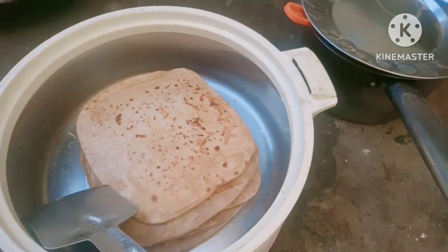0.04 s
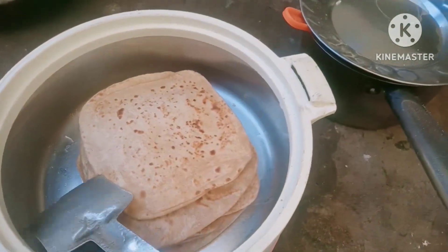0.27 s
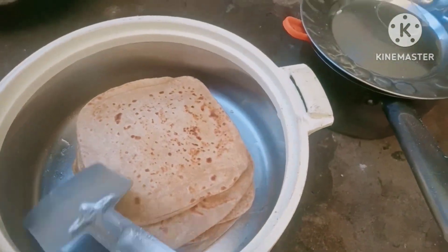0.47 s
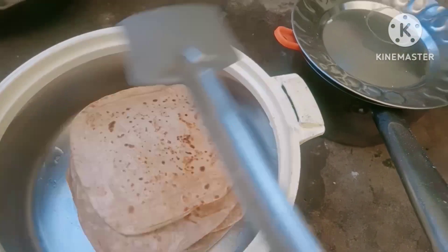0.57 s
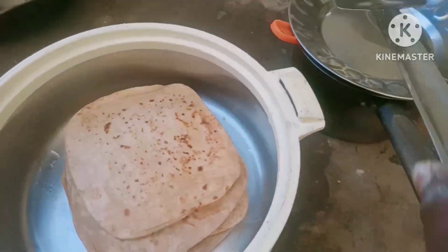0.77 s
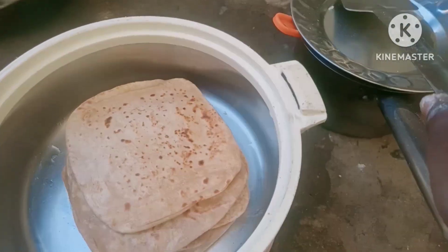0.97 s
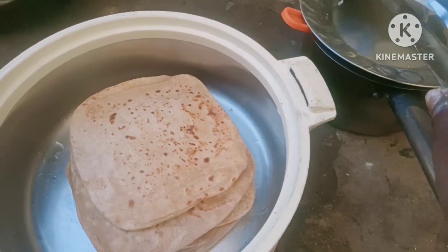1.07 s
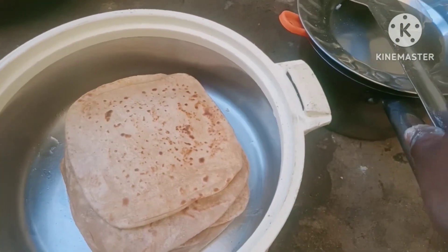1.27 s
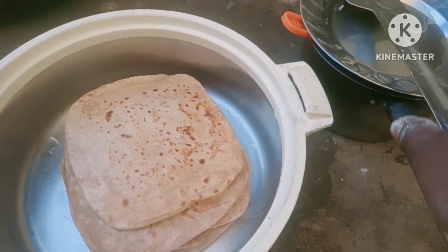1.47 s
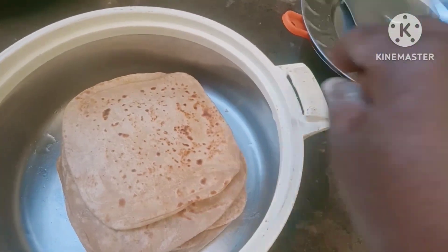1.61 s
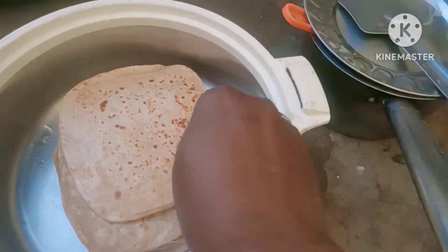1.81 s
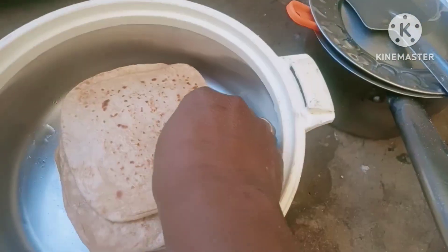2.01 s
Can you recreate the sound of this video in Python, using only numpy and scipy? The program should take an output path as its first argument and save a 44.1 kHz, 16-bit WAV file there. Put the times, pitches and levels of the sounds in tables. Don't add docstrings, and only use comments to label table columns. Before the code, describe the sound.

Steel plates clatter loudly as a spatula is put down on them, after a short scrape, thin squeak and soft thumps of flatbread in a pot; small kitchen, close phone microphone, loudest hits distorting.

```python
import sys
import numpy as np
from scipy import signal
from scipy.fft import rfft, irfft, next_fast_len
from scipy.io import wavfile
from scipy.ndimage import map_coordinates

SR = 44100
rng = np.random.default_rng(int(sys.argv[2]) if len(sys.argv) > 2 else 0)


def magnitude_from_level(level_db):
    exponent = np.asarray(level_db, float) / 20
    return 10 ** exponent


def log_audio(samples):
    frames = np.atleast_2d(samples).T
    limited = np.clip(frames, -1, 1)
    pcm = np.round(limited * 32767).astype(np.int16)
    wavfile.write(sys.argv[1], SR, pcm)


N = 90404


def along(points, hz):
    point_hz, value = np.transpose(points)
    return np.interp(np.log(hz + 1), np.log(point_hz + 1), value)


def unit(x):
    return x / np.sqrt(np.mean(x ** 2) + 1e-20)


def coloured(x, spectrum):
    size = next_fast_len(len(x) + 4096)
    gain = magnitude_from_level(along(spectrum, np.fft.rfftfreq(size, 1 / SR)))
    return unit(irfft(rfft(x, size) * gain, size)[:len(x)])


def above(x, low_hz):
    return signal.sosfilt(signal.butter(4, low_hz, "high", fs=SR, output="sos"), x)


def wobble(knots_per_s):
    knots = rng.standard_normal(int(N * knots_per_s / SR) + 4)
    return map_coordinates(knots, [np.arange(N) * knots_per_s / SR])


def ring(hz, db, t60_s, t):
    decay = np.exp(-np.log(1000) * t / t60_s[:, None])
    return magnitude_from_level(db) @ (decay * np.sin(2 * np.pi * hz[:, None] * t))


def dying(t60_points, length, long=1):
    hz, t, z = signal.stft(rng.standard_normal(length), SR, nperseg=256)
    t60_s = long * along(t60_points, hz)[:, None]
    tail = signal.istft(z * magnitude_from_level(-60 * t / t60_s), SR, nperseg=256)[1][:length]
    return tail / np.linalg.norm(tail)


def add(track, s, sound):
    part = track[round(s * SR):][:len(sound)]
    part += sound[:len(part)]


# (frequency [Hz], density [dB per Hz])
AIR_SPECTRUM = [(18, -58), (30, -13), (200, -4.5), (400, -16.5), (883, -24.5), (1060, -24), (1700, -20.5),
                (6830, -23), (15800, -46)]
AIR_DB = -43


def air():
    noise = coloured(rng.standard_normal(N), AIR_SPECTRUM)
    return magnitude_from_level(AIR_DB + wobble(8)) * above(noise, 45)


# (frequency [Hz], T60 [s])
ROOM_DECAY = [(200, 0.37), (3000, 0.24), (12000, 0.16)]


def room(x):
    return signal.fftconvolve(np.pad(x, (300, 0)), dying(ROOM_DECAY, SR // 2))[:N]


# (time [s], level [dB])
SCRAPE_PRESSURE = [(0, -36), (0.049, -33.5), (0.148, -31.5), (.23, -42.5), (.4, -49.5), (.6, -48.5),
                   (0.688, -80), (0.705, -44.5), (.8, -47)]
# (frequency [Hz], density [dB per Hz])
RASP_SPECTRUM = [(180, -30), (300, -2), (411, -20), (563, -7), (839, -6), (3990, -2), (8550, -18.5),
                 (12500, -16), (15800, -25)]
GRIT_PER_S, GRIT_DB, GRIT_SPREAD_DB = 2500, -4, 1.5


def scrape():
    s, db = np.transpose(SCRAPE_PRESSURE)
    hits = rng.random(N) < GRIT_PER_S / SR
    grit = hits * rng.standard_normal(N) * magnitude_from_level(GRIT_SPREAD_DB * rng.exponential(1, N))
    friction = rng.standard_normal(N) + magnitude_from_level(GRIT_DB) * unit(grit)
    pressure_db = np.interp(np.arange(N) / SR, s, db, right=-120) + 2.3 * wobble(34.4)
    return coloured(friction, RASP_SPECTRUM) * magnitude_from_level(pressure_db)


# (frequency [Hz], level [dB], peak time [s], spread [s])
SQUEAK_TONES = [(4050, -33, .162, .013), (4040, -35, .212, .014), (11250, -48, .12, .02),
                (11300, -49, .18, .025), (12250, -42, .18, .028), (13300, -48, .228, .008),
                (13900, -49, .177, .01), (7200, -47, .167, .008)]
SQUEAK_FLUTTER_DB, SQUEAK_BLUR_RAD = 5, 0.045


def squeak():
    out, t = np.zeros(N), np.arange(N) / SR
    for hz, db, peak_s, spread_s in SQUEAK_TONES:
        swell = np.exp(-((t - peak_s) / spread_s) ** 2 / 2)
        level = magnitude_from_level(db + SQUEAK_FLUTTER_DB * wobble(97.4) / 2)
        drift = np.cumsum(SQUEAK_BLUR_RAD * hz / 8000 * rng.standard_normal(N))
        out += swell * level * np.sin(2 * np.pi * hz * t + drift)
    return out


# (time [s], peak [dB], upper shell modes [dB], slap [dB], deepest mode [dB])
POT_THUMPS = [(0.111, -24, 17.5, 2, -3.5), (.238, 3.5, -6, 1, 3), (0.297, -4, -8, -6.5, -12),
              (0.364, -3, -4, 1.5, -20), (0.454, -11.5, 6.5, -0.5, -9), (0.525, -24, -25, -16, -2),
              (.699, -27.5, 13.5, 13.5, -16), (.773, -8, 14, -1, -27), (0.797, -22, 19.5, 7, -7),
              (1.233, -26.5, -10, -18, -12)]
# (frequency [Hz], level [dB], T60 [s])
POT_MODES = [(161.4, 0, 0.21), (204.9, -1.5, 0.14), (243.7, -9, 0.28), (379, -30, 0.19),
             (482, -14.5, 0.053), (564, -16, 0.079), (767, -30.5, 0.17), (304, -25, 0.43)]
# (frequency [Hz], density [dB per Hz])
SLAP_SPECTRUM = [(410, 3.5), (700, -1), (965, -3.5), (1180, -2), (3180, -3), (9330, -28), (15000, -31)]
SHELL_FROM_HZ, THUMP_RISE_S, POT_LOW_HZ = 330, 0.0016, 119
SLAP_T60_S, SLAP_DB = 0.3, -24.5


def pot():
    out, t = np.zeros(N), np.arange(SR // 3) / SR
    hz, db, t60_s = np.transpose(POT_MODES)
    for s, peak_db, shell_db, slap_db, deep_db in POT_THUMPS:
        level_db = db + shell_db * (hz > SHELL_FROM_HZ) + deep_db * (hz == hz.min())
        boom = ring(hz, level_db, t60_s, t) / 2
        slap_decay = magnitude_from_level(SLAP_DB + slap_db - 60 * t / SLAP_T60_S)
        slap = slap_decay * coloured(rng.standard_normal(len(t)), SLAP_SPECTRUM)
        rise = 1 - np.exp(-t / THUMP_RISE_S)
        add(out, s, magnitude_from_level(peak_db) * rise * (boom + slap))
    return above(out, POT_LOW_HZ)


# (peak time [s], frequency [Hz], level [dB], length [s])
PLATE_KNOCKS = [(1.05, 545.5, -13.5, 0.031), (1.052, 347.4, -17.5, 0.033), (1.088, 442, -15.5, 0.023),
                (1.108, 516.5, -10, 0.026), (1.441, 531, -13, .016), (1.454, 449, -13, .018),
                (1.551, 456, -8.5, .016), (1.578, 522, -15, .016), (1.582, 322, -17, .025),
                (1.612, 451, -4.5, 0.01513), (1.625, 440, -6.5, 0.01847), (1.655, 377, -18.5, .06),
                (1.655, 563, -24.5, .05), (1.68, 467, -13.5, .014), (1.699, 448, -10, .04),
                (1.703, 356.3, -15, 0.037), (1.74, 369, -36, 0.063), (1.76, 550, -25.5, .06),
                (1.806, 491, -24.5, .03), (1.855, 540, -29, 0.051), (1.88, 413, -29.5, .03)]


def knocks():
    out = np.zeros(N)
    for peak_s, hz, db, length_s in PLATE_KNOCKS:
        t = np.arange(round(length_s * SR)) / SR
        swell = np.sin(np.pi * t / length_s) ** 2
        add(out, peak_s - length_s / 2, magnitude_from_level(db) * swell * np.sin(2 * np.pi * hz * t))
    return out


# (time [s], level [dB])
RIM_TICKS = [(0.962, -21.5), (1.546, -16.5), (1.676, -14), (1.741, -12.5), (1.787, -18.5), (1.835, -22),
             (1.857, -22.5)]
TICK_HZ, TICK_T60_S = 1576, 0.018


def ticks():
    out, t = np.zeros(N), np.arange(SR // 20) / SR
    for s, db in RIM_TICKS:
        add(out, s, magnitude_from_level(db - 60 * t / TICK_T60_S) * np.sin(2 * np.pi * TICK_HZ * t))
    return out


# (time [s], frequency [Hz], level [dB], length until damped [s])
LONE_PINGS = [(1.409, 2240, -13, .027), (1.481, 3228, -13, .026), (.860, 1890, -22, .17),
              (1.464, 1935, -12, .11), (.906, 3075, -26, .013), (.861, 3495, -23, .028),
              (1.128, 2361, -23, .175), (1.112, 3020, -22, .11), (1.463, 560, -19, .078),
              (.906, 3522, -20, .036), (.849, 1435, -23, .034), (.847, 556, -23, .034),
              (.979, 3043, -25, .024), (.979, 2376, -28, .04), (.881, 3050, -28, .013),
              (1.049, 2372, -24, .034), (1.096, 1072, -26, .038), (1.104, 1935, -24, .085),
              (1.118, 538, -23, .042), (1.112, 2792, -30, .065), (1.446, 1340, -20, .064),
              (1.462, 2620, -24, .09), (1.601, 1940, -14, .068), (1.579, 1352, -16, .044),
              (1.579, 3018, -14, .048), (1.706, 2368, -22, .05), (1.716, 1881, -21, .115),
              (1.716, 3205, -24, .062), (1.803, 3478, -30, .075), (1.626, 1437, -21, .028),
              (1.696, 1350, -23, .044), (1.806, 1037, -39, .03), (1.088, 12400, -30, .02),
              (.847, 13100, -40, .04), (1.842, 2614, -36, .08), (1.795, 11100, -46, .035),
              (1.580, 12300, -32, .02), (1.700, 11100, -36, .03), (1.083, 1552, -17, .012)]
PING_T60_S, PING_RISE_S, DAMP_S = 0.45, 0.00075, 0.004


def pings():
    out = np.zeros(N)
    for s, hz, db, length_s in LONE_PINGS:
        t = np.arange(round((length_s + 8 * DAMP_S) * SR)) / SR
        shape = (1 - np.exp(-t / PING_RISE_S)) * np.exp(-np.maximum(t - length_s, 0) / DAMP_S)
        add(out, s, magnitude_from_level(db - 60 * t / PING_T60_S) * shape * np.sin(2 * np.pi * hz * t))
    return out


# (time [s], peak [dB], low modes [dB], mid modes [dB], ring time factor [1])
TOUCHING_CONTACTS = [(0.844, -9.5, 3, 0.5, 0.39), (0.8574, -15.5, -21, -4, 0.64),
                     (0.8846, -13.5, -25, -10, 0.5), (0.9073, -17, -4, -29, 0.8),
                     (0.9594, -16.5, 1.5, -2.5, 0.41), (0.9794, -22, -2, -1, 1)]
LAYING_CONTACTS = [(1.0454, -14, -7, 0.5, 0.69), (1.052, -11.5, 2, -1.5, 0.7),
                   (1.0864, 2.5, -12, -12, 0.51), (1.0974, -12.5, 2, 1, 0.17),
                   (1.1394, -29.5, -20, 8.5, 0.43), (1.2625, -28.5, -28, -24, 0.46)]
SETTLING_CONTACTS = [(1.351, -24.5, -44, -10, 0.77), (1.3709, -13, -11, -20, 0.2),
                     (1.4082, -14.5, -4, -3.5, 1), (1.4348, 4, -6.5, -8, 1), (1.4452, 1.5, -7.5, -8, 0.84),
                     (1.4537, -3, -23, -29, 0.85), (1.4804, -15, -25, -20, 1),
                     (1.543, -9.5, -17, 1.5, 0.55), (1.5774, 2.5, -9, -7.5, 0.52),
                     (1.6064, -3, -2, -2, 0.81), (1.6211, -3, -11, -11, 0.41), (1.6454, -17, -8, 6, 0.77),
                     (1.6757, -13.5, 5, 4, 0.41), (1.694, -4, 1.5, -4.5, 0.51),
                     (1.7143, -11, -22, -20, 0.72), (1.7403, -13.5, -14, 3, 0.28),
                     (1.7872, -22.5, 4, 4.5, 0.85), (1.8066, -18.5, -1.5, 2, 0.35),
                     (1.8347, -40, -5, -12, 0.43), (1.8574, -27.5, -4, -4, 1),
                     (2.0144, -26.5, -43, -22, 0.28)]
# (frequency [Hz], level [dB], T60 [s])
BLADE_MODES = [(357, -10.5, 0.24), (441, -5.5, 0.18), (548, -8, 0.5), (1067, -17.5, 0.25), (1360, -15, 1),
               (1448, -5, 0.16), (1815, -9.5, 0.6), (1860, -25, 1), (2323, 0, 0.092), (2620, -30, 0.18),
               (2980, -6, 0.04), (3530, -4, 0.11), (3100, -7, 0.23), (3810, -16, 0.14)]
PLATE_MODES = [(359, -13, 0.29), (438.5, -5.5, 0.21), (547, -7.5, 0.29), (1345, -11, 0.42),
               (1451, -10.5, 0.25), (1900, -9, 0.66), (1950, -9.5, 0.84), (2184, -12, 0.24),
               (2665, -35, 0.53), (2500, -40, 0.13), (2876, -14.5, 0.55), (3017, -8.5, 0.091),
               (3350, -2.5, 0.094), (3640, -42, 0.14)]
# (frequency [Hz], density [dB per Hz])
DENSE_SPECTRUM = [(500, -34), (1000, -13), (2000, -10), (3150, 3.5), (4400, -17), (5600, -10.5),
                  (8000, -20), (12500, -16.5), (15800, -19)]
THIN_SPECTRUM = [(410, -55), (700, -20), (2790, -1.5), (3440, 10), (3970, -12), (15800, -18)]
# (frequency [Hz], T60 [s])
DENSE_DECAY = [(1000, 0.9), (3000, .2), (6000, 0.21), (15000, 0.043)]
LOW_UNDER_HZ, MID_UNDER_HZ, STEEL_LOW_HZ = 800, 2500, 259
CLEAR_DB, STRAY_DB, CRASH_DB = -5.5, -15.5, 0.5
LOW_DETUNE, NEXT_CONTACT_DAMPS_DB, STEEL_RISE_S = 0.03, 19, 0.00073
CHATTER_PER_S, CHATTER_T60_S, CHATTER_DB = 700, 0.28, -6.5


def steel(contacts, modes, dense):
    out, t = np.zeros(N), np.arange(SR // 5) / SR
    hz, db, t60_s = np.transpose(modes)
    low = hz < LOW_UNDER_HZ
    next_times_s = [row[0] for row in contacts[1:]] + [N / SR]
    for (s, peak_db, low_db, mid_db, long), next_s in zip(contacts, next_times_s):
        long = np.clip(long, 0.2, 2)
        level_luck, pitch_luck = rng.normal(0, 1, (2, len(hz)))
        contact_db = np.where(low, low_db, mid_db * (hz < MID_UNDER_HZ))
        level_db = db + contact_db + CLEAR_DB + 1.4 * level_luck
        clear = ring(hz * (1 + LOW_DETUNE * low * pitch_luck), level_db, t60_s * long, t)

        pitch_draw, decay_draw = rng.random((2, 24))
        stray_hz = 3900 + 11600 * pitch_draw ** 2
        stray_t60_s = 2 * long * along(DENSE_DECAY, stray_hz) * (0.5 + decay_draw)
        stray = ring(stray_hz, STRAY_DB + along(dense, stray_hz), stray_t60_s, t)
        crash = coloured(dying(DENSE_DECAY, len(t), long), dense)
        body = stray + magnitude_from_level(CRASH_DB) * crash / np.abs(crash).max()

        hits = rng.random(len(t)) < CHATTER_PER_S / SR
        taps = hits * rng.standard_normal(len(t)) * magnitude_from_level(CHATTER_DB - 60 * t / CHATTER_T60_S)
        taps[0] = 1
        sound = clear + signal.fftconvolve(body, taps / np.linalg.norm(taps))[:len(t)]
        damped_db = NEXT_CONTACT_DAMPS_DB * np.clip((t + s - next_s) / 0.015, 0, 1)
        rise = 1 - np.exp(-t / STEEL_RISE_S)
        fade = np.hanning(2 * len(t))[len(t):]
        add(out, s, magnitude_from_level(peak_db - damped_db) * sound * rise * fade)
    return above(out, STEEL_LOW_HZ)


def scene():
    near = pot() + knocks() + ticks() + pings()
    near += steel(TOUCHING_CONTACTS, BLADE_MODES, THIN_SPECTRUM)
    near += steel(LAYING_CONTACTS, BLADE_MODES, DENSE_SPECTRUM)
    near += steel(SETTLING_CONTACTS, PLATE_MODES, DENSE_SPECTRUM)
    room_db = -11.5
    return (near + magnitude_from_level(room_db) * room(near) + scrape() + squeak() + air())[None]


def roll_off(x):
    return signal.sosfilt(signal.butter(12, 15990, fs=SR, output="sos"), x)


def record(dry):
    top_hz, clip_top, clip_knee = 15650, 1.0, 8
    limited = signal.sosfilt(signal.cheby1(12, 0.3, top_hz, fs=SR, output="sos"), dry)
    mix = limited / (1 + np.abs(limited / clip_top) ** clip_knee) ** (1 / clip_knee)
    return roll_off(mix)


dry = scene()
out = record(dry)
log_audio(out)
```